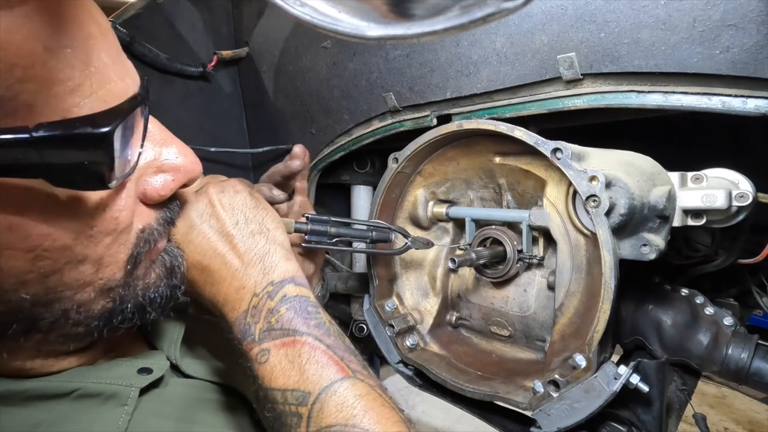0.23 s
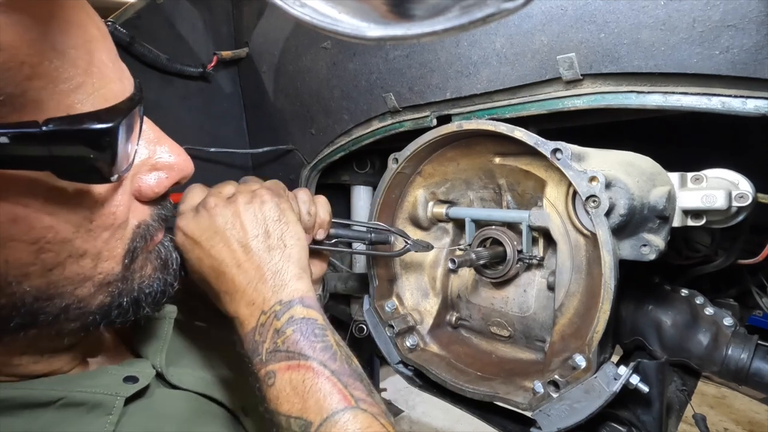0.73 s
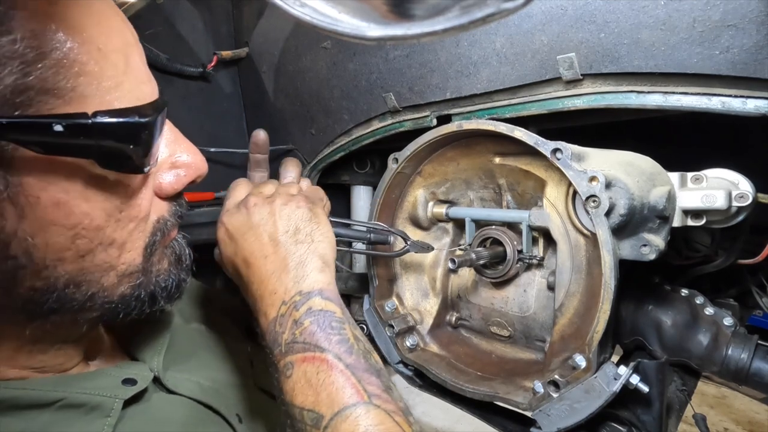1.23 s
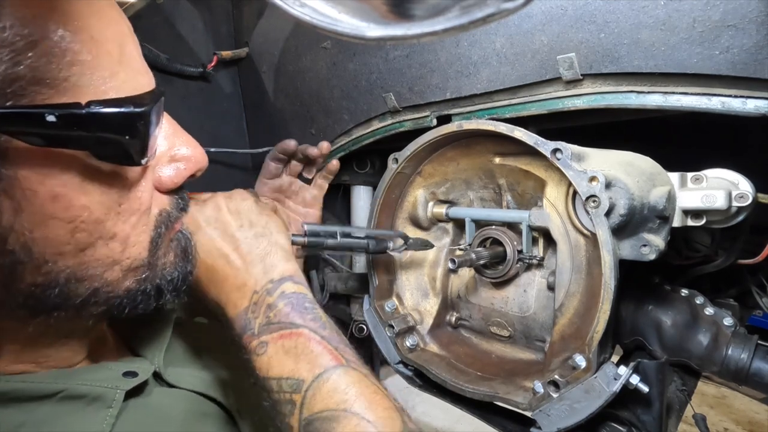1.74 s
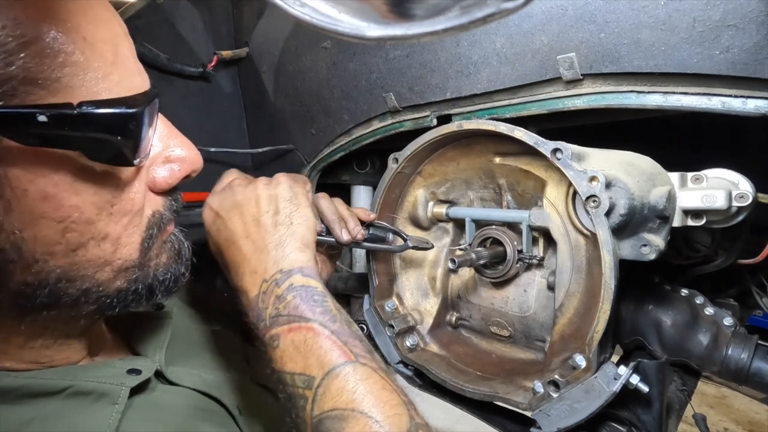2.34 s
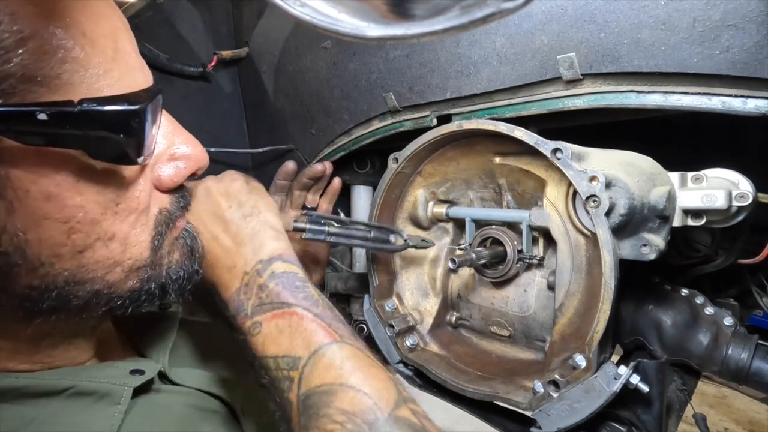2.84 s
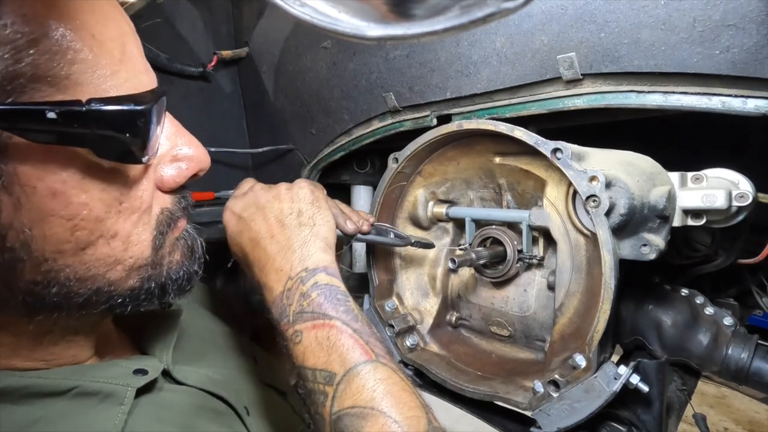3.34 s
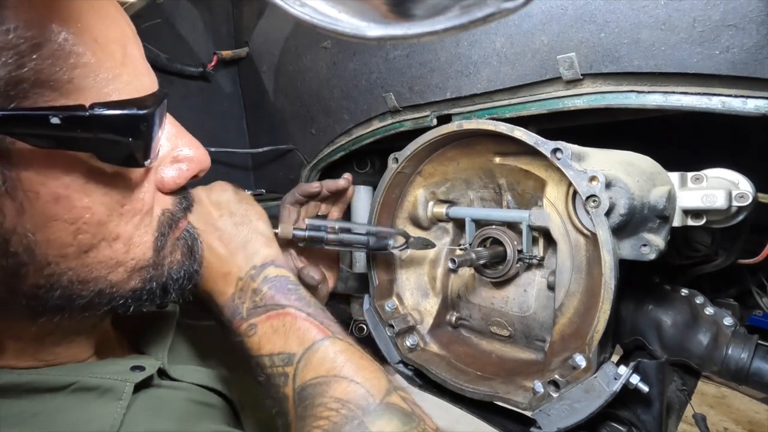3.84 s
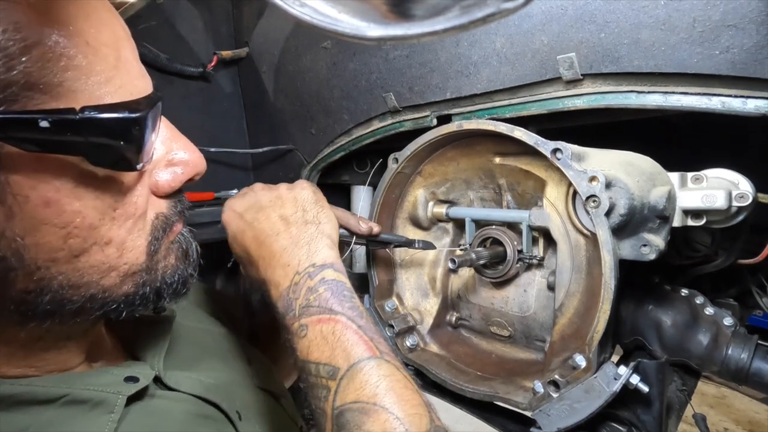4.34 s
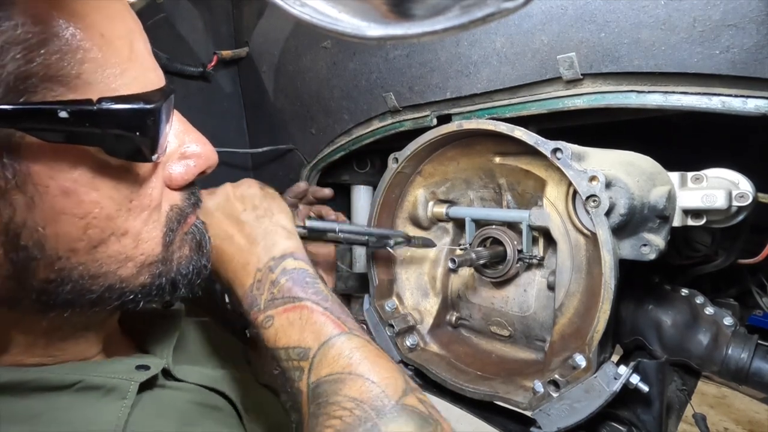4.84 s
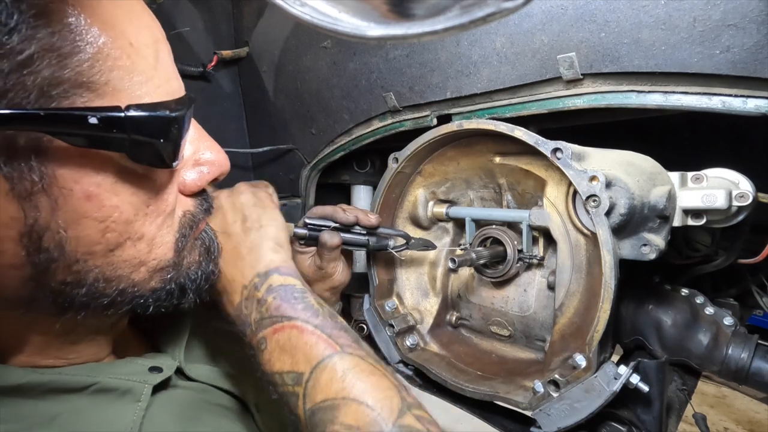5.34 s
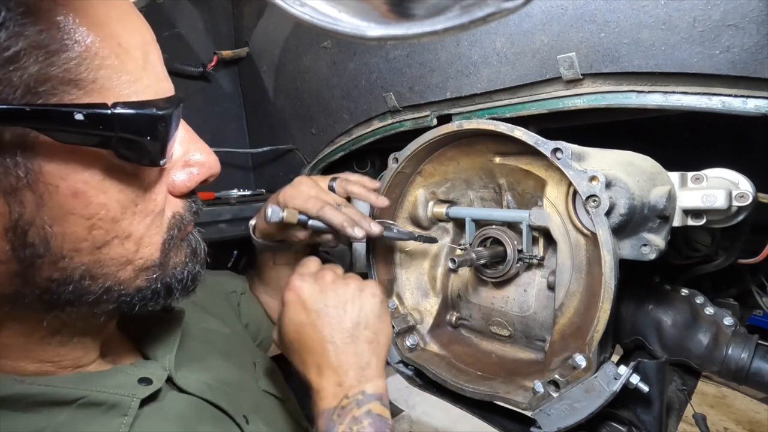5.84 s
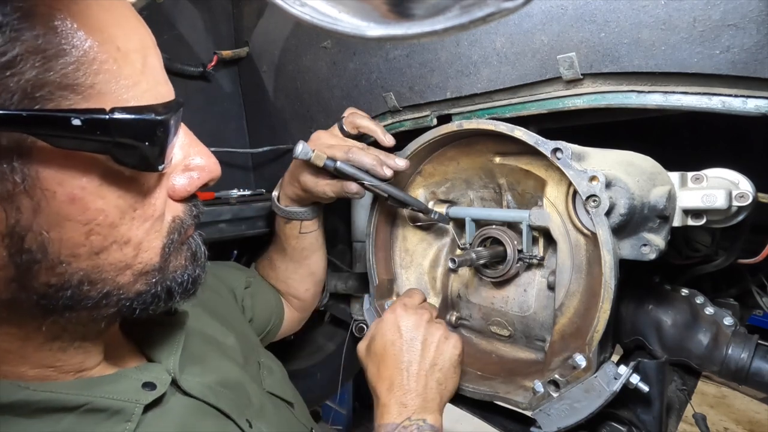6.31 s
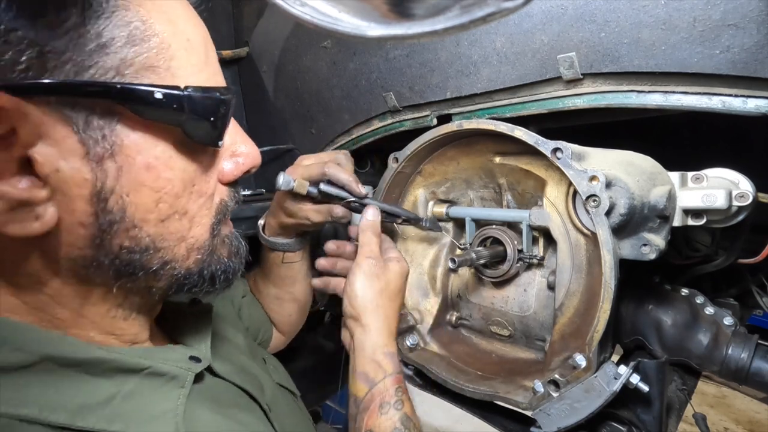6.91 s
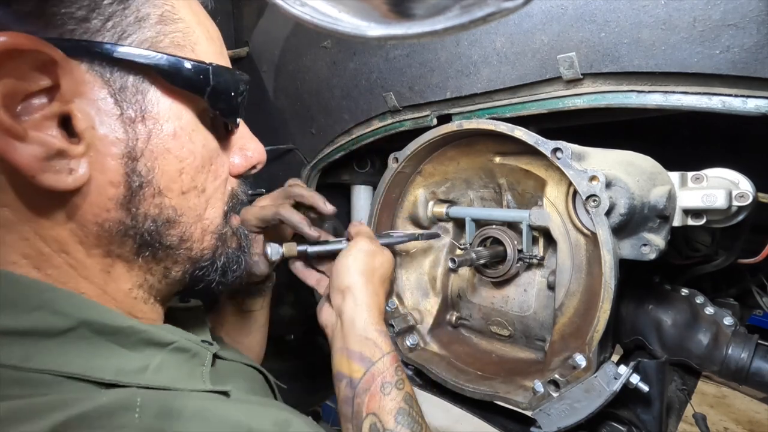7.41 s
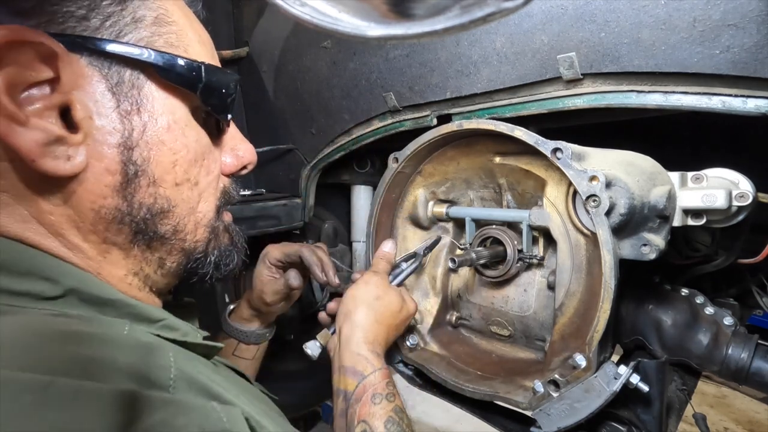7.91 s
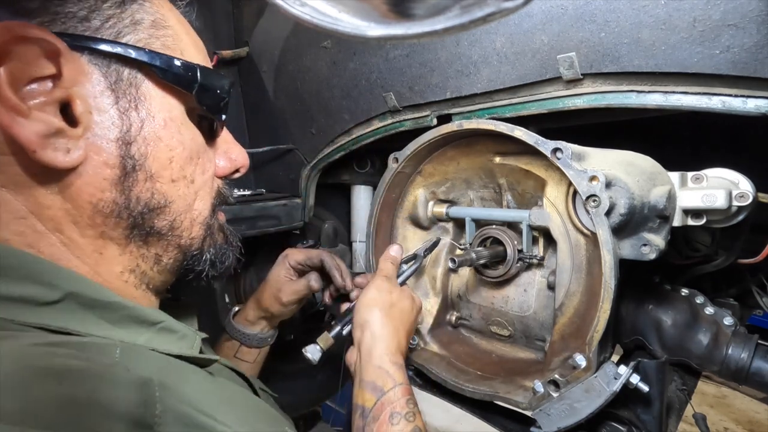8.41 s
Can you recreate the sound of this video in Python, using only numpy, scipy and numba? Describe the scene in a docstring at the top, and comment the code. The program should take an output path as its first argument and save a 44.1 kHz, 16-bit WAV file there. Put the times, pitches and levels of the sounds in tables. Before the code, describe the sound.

Close up in a workshop, spring-return pliers tick, scrape and whirr as their spiral rod is drawn out and spins. Four loud, crisp steel snaps come between two and five and a half seconds, each with a tiny bounce and a short dense echo. A steady low motor hum and soft, dark fan rush continue throughout; the last seconds hold mostly hum and faint deep thuds.

```python
"""Wire-twisting pliers are pulled, spin and snap back an arm's length from a small stereo camera in a workshop.
Steel parts tick and ring as decaying modes; the spiral rod rattles in its guide as tiny knocks excite its modes.
The workshop answers with a dense echo; behind it are fan noise, motor tones and a few deep soft thuds.
The camera turns everything above the bass down for a moment when it gets loud, as after each snap."""
import sys
import numpy as np
from scipy import signal
from scipy.fft import rfft, irfft, next_fast_len
from scipy.io import wavfile
from scipy.ndimage import uniform_filter1d
from numba import njit

SR = 44100
rng = np.random.default_rng(int(sys.argv[2]) if len(sys.argv) > 2 else 0)


def to_wav(s):
    """Save 16-bit WAV."""
    ch = np.atleast_2d(s).T  # columns
    pcm = np.round(np.clip(ch, -1, 1) * 32767)  # PCM
    wavfile.write(sys.argv[1], SR, pcm.astype(np.int16))


N = 381906

# modes of the hand-held pliers in three groups: (frequency [Hz], relative level [dB], t60 [s])
LOW_RING = [(2100, -8, .018), (2500, -6, .013), (2980, -1, .016), (3440, 0, .016), (3880, 0, .016),
            (4500, -1, .015), (4890, -5, .015)]
MIDDLE_RING = [(5510, -7, .014), (6050, -5, .014), (6610, -3, .015), (6960, -1, .015), (7530, 0, .018),
               (8120, -4, .014), (8860, -4, .014)]
HIGH_RING = [(9500, -3, .012), (9930, -1, .014), (10500, -2, .014), (11100, 0, .012), (12200, -7, .012),
             (12900, -9, .012), (13600, -14, .012)]
# modes of the spiral rod, free to ring, one list for each group: (frequency [Hz], relative level [dB], t60 [s])
ROD_RINGS = [
    [(3010, 0, .02), (3500, -3, .015), (4030, -3, .02), (4750, -3, .022)],
    [(6340, -4, .025), (6620, 0, .035), (7100, -6, .02), (7490, -4, .025), (7730, -5, .025),
     (8120, 0, .035)],
    [(10000, -9, .025), (10500, -8, .025), (11150, 0, .04), (11600, -11, .02), (12000, -11, .02),
     (12900, -7, .035), (13300, -14, .02), (15600, -27, .03)],
]
# borders of the low, middle and high group, then the upper limit of the spinning rod: frequency [Hz]
RING_EDGES_HZ = (2300, 5300, 9300, 13500, 15700)

# sprung rod snaps home and bounces once: (time [s], middle ring level [dB],
# low, middle and high pitch that stand out [Hz], bounce delay [s], bounce middle ring level [dB])
SNAPS = [(2.2516, -5, 4210, 6730, 10450, 0.0063, -24), (3.2981, -2, 4360, 7020, 9280, 0.0045, -18.5),
         (4.2456, -3.5, 3620, 7340, 9900, .0076, -20), (5.4158, -5, 3030, 8670, 9750, 0.0078, -24)]
# pitches that stand out in every bounce: frequency [Hz]
BOUNCE_HZ = (3950, 7440)
# a part knocks against the hand-held pliers:
# (time [s], middle ring level [dB], low over middle ring [dB], pitch that stands out [Hz])
KNOCKS = [(.5806, -43, 8, 3680), (.6215, -51, 5, 3380), (0.636, -44.5, 6.5, 3600), (0.644, -35, 4.5, 2650),
          (0.648, -33, -6.5, 8010), (.66, -30.5, 6.5, 2800), (.6888, -41, 2.5, 2880),
          (.8038, -33.5, 1.5, 7800), (.85, -44, -7, 7860), (.8874, -43, 0, 8010), (.9976, -49, 9, 2280),
          (1.058, -44.5, 5, 7200), (1.1532, -41, 13.5, 3100), (1.3877, -46, -7, 7900),
          (1.45, -48.5, 11, 2520), (1.6377, -53, 8, 2330), (1.694, -49, -4, 7600), (1.792, -39, -3, 8100),
          (1.856, -43.5, 10.5, 3640), (2.145, -42, 2.5, 5730), (2.208, -40, 8, 4850),
          (2.237, -32.5, -5, 4840), (2.2456, -23, -10.5, 7860), (2.3835, -43, -1, 7350),
          (2.4453, -42, -10, 6640), (2.556, -46, 9, 3530), (2.8973, -39, -4, 7580), (2.97, -28, -0.5, 7160),
          (3.25, -36, 1, 6590), (3.276, -33, -13, 7140), (3.282, -40, 6, 3100), (3.293, -26, 5, 3360),
          (3.313, -29.5, 1.5, 7320), (3.5425, -52.5, 13, 2930), (3.99, -33.5, 1.5, 3140),
          (4.104, -41.5, 10, 2900), (4.1415, -45, 3, 3270), (4.157, -49, 15, 3530),
          (4.1894, -44.5, 6, 3250), (4.2038, -29.5, -1, 7670), (4.218, -39, 1, 2930), (4.432, -42, 6, 2990),
          (4.4862, -48, -2, 3190), (4.549, -44.5, 9, 2970), (4.5954, -47.5, 12, 3540),
          (4.615, -34, 1, 6910), (5.0489, -37, -10, 7840), (5.0676, -35, 0, 3160),
          (5.107, -34.5, 4.5, 3950), (5.273, -36, 11.5, 3540), (5.29, -45, -5.5, 5680),
          (5.3787, -32.5, -10, 6720), (5.6727, -44, 2, 3600), (5.7833, -51, 19, 3060),
          (5.82, -43, -9, 6960), (5.855, -54, 17, 4300), (6.784, -51, 0, 7020), (7.107, -49, -1, 6310),
          (7.38, -58, 9.5, 2710)]
# the free rod is tapped in its guide: (time [s], high ring level [dB], middle over high ring [dB])
TAPS = [(.0677, -51, 14), (.164, -50, 10), (1.89, -47, -2), (1.8976, -36, -12), (2.999, -30, -18),
        (3.039, -42, -3), (3.1617, -52, 0), (3.5912, -46, -3), (3.8003, -50, -7), (3.883, -36, -7),
        (3.9759, -29.5, -9), (4.008, -33, -18), (4.8145, -52, -10), (4.8316, -40.5, 0.5), (4.9053, -48, 4),
        (4.9473, -41, -12), (5.002, -26, -4), (5.094, -38, -8), (5.125, -40, 0), (5.2495, -50, -6),
        (8.356, -54, -17)]
# the rod is drawn out and the pliers spin, gathering speed or coasting:
# (time [s], length [s], first level [dB], last level [dB]), before the balance of the rings
SPINS = [(.066, .03, -46, -62), (.17, 0.14, -44, -65), (1.89, .05, -48, -60), (2.14, .04, -47, -64),
         (2.985, 0.082, -50, -53), (3.162, .015, -58, -64), (3.245, .025, -43, -51),
         (3.59, 0.054, -54, -64), (3.805, 0.16, -52, -39), (3.982, 0.042, -36, -40), (4.822, .03, -50, -62),
         (4.89, 0.068, -55, -46), (5.005, 0.022, -37, -45), (5.05, 0.1, -44, -38.5)]
# the rod slides in its guide and hands shift their grip: columns as in SPINS
SLIDES = [(.58, .025, -44, -55), (.63, 0.028, -45, -26.5), (1.14, 0.015, -47, -39),
          (1.848, 0.014, -50, -37), (2.2, .048, -49, -31), (3.272, 0.037, -37, -32), (4.19, 0.06, -40, -34),
          (5.24, .03, -54, -50), (5.283, .02, -44, -49), (5.376, .036, -36, -28.5),
          (5.77, 0.033, -49, -42.5), (5.815, 0.067, -46, -58)]

# the camera's two ports hear the pliers unlike: (frequency [Hz], left minus right [dB])
PLIERS_LEFT = [(2000, -5.5), (4400, -1.3), (8000, -2.5), (15000, 2.5)]
# (frequency [Hz], phase by which left lags [rad])
PLIERS_LAG = [(1500, .6), (2600, .1), (4700, .3), (5100, .8), (5800, .1), (8300, .8), (9000, .2),
              (11300, .2), (11800, -1.6), (12500, -1.0), (13300, -.3)]
# workshop echo, its narrow bands ringing on in the cast housing:
# (low edge [Hz], high edge [Hz], level [dB], t60 [s])
SHOP_ECHO = [(1500, 8500, -14, 0.42), (5410, 5900, -21.5, .5), (9000, 14000, -25.5, .3),
             (6600, 6700, -17.5, .5), (9500, 10500, -25, .3)]

# spectrum of the rushing air: (frequency [Hz], relative density [dB per Hz])
AIR_SPECTRUM = [(20, -6), (36, -2), (66, -3.5), (97, -3.5), (142, -6), (185, -9), (270, -14.5), (480, -18),
                (800, -22.5), (1400, -25), (2300, -33.5), (4000, -39.5), (7400, -50), (8600, -59.5),
                (12500, -63.5), (14500, -93.5)]
# resonances of the duct: (frequency [Hz], width [Hz], boost [dB])
DUCT = [(1035, 135, 5.5), (1334, 90, 4), (1844, 210, 5)]
# likeness of the air in the two channels: (frequency [Hz], correlation [0-1])
AIR_ALIKE = [(25, .93), (60, .96), (130, .97), (290, .98), (640, .9), (1410, .82), (2400, .6), (3500, .72),
             (7000, .5), (10000, .75), (15000, .4)]
# balance of the air: (frequency [Hz], left minus right [dB])
AIR_LEFT = [(25, -1), (100, 0), (300, .4), (700, 2), (1290, 4), (2380, 1.5), (8120, 2), (15000, 3)]
# phase of the air: (frequency [Hz], phase by which left lags [rad])
AIR_LAG = [(300, 0), (900, .3), (1400, .7), (2000, 1.05), (2700, .45), (4500, .1), (6000, 0)]
# mains hum, a compressor, a fan and their sum tones: frequency [Hz] in one list, rms level [dB] in the other
HUM_HZ = [48.38, 55.14, 103.15, 110.31, 119.98, 128.41, 133.98, 148.3, 153.95, 161.98, 220.84, 239.98,
          253.95, 307.88, 331.15, 359.96, 479.97, 699.11]
HUM_DB = [-40, -26, -35, -38, -16, -26, -32, -43, -33, -43, -48, -48, -40, -45, -51, -47, -52, -51]
# deep soft thuds: (time [s], peak level [dB], frequency [Hz], length [s])
THUDS = [(3.27, -8, 30.3, 0.059), (6.189, -17, 30, 0.19), (6.67, -18, 32, 0.13), (7.203, -13, 34, 0.18),
         (8.018, -19, 34, 0.1)]


def undb(db):
    """Decibels to gain."""
    return 10 ** (np.asarray(db) / 20)


def unit(x):
    """Scale to rms 1."""
    return x / np.sqrt(np.mean(x ** 2))


def on_log(table, hz):
    """Read (Hz, value) rows on a log-frequency axis."""
    return np.interp(np.log(hz), np.log(np.array(table)[:, 0]), np.array(table)[:, 1])


def band(x, lo_hz, hi_hz, order=2):
    """Band-pass."""
    return signal.sosfilt(signal.butter(order, [lo_hz, hi_hz], "band", fs=SR, output="sos"), x)


def add(out, s, sound):
    """Mix a stereo sound in from time s."""
    i = int(s * SR)
    out[:, i:i + sound.shape[1]] += sound[:, :N - i]


def walk(rate):
    """Random levels held 1 / rate s and slewed twice; spread 1."""
    k = int(SR / rate)
    return unit(uniform_filter1d(uniform_filter1d(np.repeat(rng.standard_normal(N // k + 1), k), k), k)[:N])


@njit
def follow(x, attack, release):
    """Envelope that rises fast and falls slowly."""
    e, out = 0., np.empty(len(x))
    for i in range(len(x)):
        e += (x[i] - e) * (attack if x[i] > e else release)
        out[i] = e
    return out


def pliers_blows(scatter_db=5.0, detune=0.02, crack_db=-2.3, crack_s=0.0059, rise_s=0.00042, stray_db=3.5):
    """Blows ring the hand-damped pliers under a crack of chattering contacts; taps ring the free rod's modes."""
    struck_db, struck_t60 = 8.0, .016  # the pitches that stand out
    dull_hz = 12800.0
    out = np.zeros((2, N))
    t = np.arange(int(SR / 12)) / SR
    for s, ring_db, pan_db, pitches, on_rod in snaps_knocks_and_taps():
        sound = 0
        for k, body in enumerate((LOW_RING, MIDDLE_RING, HIGH_RING)):
            lo_hz, hi_hz = RING_EDGES_HZ[k:k + 2]
            if on_rod:
                blow = struck_modes(ROD_RINGS[k], t, scatter_db, detune / 4)
            else:
                crack = unit(band(rng.standard_normal(len(t)), lo_hz, hi_hz, order=3)) * np.exp(-t / crack_s)
                # grip and place of the blow decide which pitch stands out
                struck = [(hz, struck_db, struck_t60) for hz in pitches if lo_hz <= hz < hi_hz]
                blow = struck_modes(body + struck, t, scatter_db, detune) + undb(crack_db) * crack
            sound = sound + undb(ring_db[k]) * blow
        pan_db = pan_db + stray_db * rng.standard_normal()
        left_right = undb(np.array([[pan_db], [-pan_db]]) / 2)
        add(out, s, sound * (1 - np.exp(-t / rise_s)) * left_right)
    # the blows carry little of the very top
    return signal.sosfilt(signal.butter(3, dull_hz, fs=SR, output="sos"), out)


def snaps_knocks_and_taps():
    """Every blow: (s, low, middle and high ring dB, left minus right dB, pitches that stand out, on free rod)."""
    rows = []
    for s, db, *pitches, after_s, bounce_db in SNAPS:
        rows.append((s, (db - 3.5, db, db - 6), 6.5, pitches, False))
        bounce_rings = (bounce_db + 1, bounce_db, bounce_db - 13)
        rows.append((s + after_s, bounce_rings, -6.5, BOUNCE_HZ, False))
    for s, db, low_db, hz in KNOCKS:
        rows.append((s, (db + low_db, db, db - 6.5), 3, [hz], False))
    for s, db, middle_db in TAPS:
        rows.append((s, (db - 8.5, db + middle_db, db), 5.5, [], True))
    return rows


def struck_modes(modes, t, scatter_db, detune):
    """One blow sets decaying sines going, rms 1 over its first 150 samples; strengths and pitches vary."""
    hz, db, t60 = np.transpose(modes)[:, :, None]
    strength, shift = rng.standard_normal((2, len(modes), 1))
    level = undb(db + scatter_db * strength - 60 * t / t60)
    sound = np.sum(level * np.sin(2 * np.pi * hz * (1 + detune * shift) * t), axis=0)
    return sound / np.sqrt(np.mean(sound[:150] ** 2))


def rattle(strokes, ring_db, groups, top_hz, grip, rate, spread_db, wander_db, grit_db, left_db):
    """Tiny uneven knocks keep modes ringing; moving contact favours ever other modes, a firm grip widens them."""
    out = np.zeros((2, N))
    gain = stroke_gain(strokes)
    chance = rng.random((3, N))
    knock_sizes = undb(-spread_db * np.log(chance[1] + 1e-9))
    knocks = (chance[0] < rate / SR) * knock_sizes * np.sign(chance[2] - .5)  # rate is knocks per second
    for k, modes in enumerate(groups):
        ringing = 0
        for hz, db, t60 in modes:
            mode = unit(band(knocks, hz - grip / t60, hz + grip / t60, order=2))
            ringing = ringing + undb(db + wander_db * walk(45.)) * mode
        # the bare knocks are heard as grit between the modes
        grit = unit(band(knocks, *RING_EDGES_HZ[k:k + 2], order=3))
        sound = unit(ringing) + undb(grit_db) * grit
        sound = band(sound, RING_EDGES_HZ[k], top_hz if k == 2 else RING_EDGES_HZ[k + 1])
        left_right_db = np.array([[left_db[k]], [-left_db[k]]]) / 2
        out += unit(sound) * gain * undb(ring_db[k] + left_right_db)
    return out


def stroke_gain(strokes, attack_s=.02, release_s=.032, uneven_db=2, jerks_per_s=51):
    """Each stroke rises 30 dB, runs from its first level to its last, falls 30 dB; the hand pushes in jerks."""
    t = np.arange(N) / SR
    gain = 0
    for s, length, first_db, last_db in strokes:
        times = [s - attack_s, s, s + length, s + length + release_s]
        levels = [first_db - 30, first_db, last_db, last_db - 30]
        gain = gain + undb(np.interp(t, times, levels, left=-200, right=-200))
    return uniform_filter1d(gain, size=200) * undb(uneven_db * walk(jerks_per_s))


def camera_ports(pliers):
    """The camera body shifts level and phase of the close sound between its two ports."""
    size = next_fast_len(N)
    hz = np.maximum(np.arange(size // 2 + 1) * SR / size, 1)
    half = undb(on_log(PLIERS_LEFT, hz) / 2) * np.exp(-.5j * on_log(PLIERS_LAG, hz))
    return irfft(rfft(pliers, size) * np.array([half, 1 / half]), size)[:, :N]


def workshop_echo(x, build_s=0.01):
    """Dense noise echoes build up and die away band by band, unrelated left and right."""
    t = np.arange(int(.8 * SR)) / SR
    echo = 0
    for lo_hz, hi_hz, db, t60 in SHOP_ECHO:
        noise = band(rng.standard_normal((2, len(t))), lo_hz, hi_hz)
        tail = noise * undb(-60 * t / t60) * (1 - np.exp(-t / build_s))
        # longer tails are scaled down to carry like energy
        echo = echo + undb(db) * tail * np.sqrt(np.log(1000) * 2 / (t60 * SR))
    return signal.fftconvolve(x[None], echo, axes=1)[:, :N]


def fan_air(level_db=-21.5, flicker_db=1.0):
    """Fan noise coloured by a duct; each octave flickers a little; alike in the bass, wide on top."""
    size = next_fast_len(N)
    hz = np.maximum(np.arange(size // 2 + 1) * SR / size, 1)
    db = on_log(AIR_SPECTRUM, hz)
    for centre_hz, width_hz, boost_db in DUCT:
        db = db + boost_db / (1 + (2 * (hz - centre_hz) / width_hz) ** 2)
    alike = np.clip(on_log(AIR_ALIKE, hz), 0, 1)
    mid, side = rfft(rng.standard_normal((2, size)))
    sign = np.array([[1], [-1]])  # left, right
    both = np.sqrt(1 + alike) * mid + sign * np.sqrt(1 - alike) * side
    both *= undb(db + sign * on_log(AIR_LEFT, hz) / 2)
    both *= np.exp(-sign * .5j * on_log(AIR_LAG, hz))
    out = 0
    octave = np.log2(hz / 20)
    for k in range(11):
        share = np.clip(1 - abs(octave - k), 0, 1)  # neighbouring octaves crossfade
        out = out + undb(flicker_db * walk(6.0)) * irfft(both * share, size)[:, :N]
    return unit(out) * undb(level_db)


def motor_hum(waver_db=.3):
    """Sines at the motors' steady pitches, each wavering slightly in level, sum alike in both channels."""
    t = np.arange(N) / SR
    start = rng.random(len(HUM_HZ))
    out = 0
    for hz, db, phase in zip(HUM_HZ, HUM_DB, start):
        level = np.sqrt(2) * undb(db + waver_db * walk(1.8))
        out = out + level * np.sin(2 * np.pi * (hz * t + phase))
    return out


def thuds():
    """Each thud is a short run of deep sound under a smooth swell."""
    out = np.zeros((2, N))
    for s, db, hz, length in THUDS:
        t = np.arange(int(length * SR)) / SR
        thud = undb(db) * np.sin(np.pi * t / length) * np.sin(2 * np.pi * hz * t)
        add(out, s, np.tile(thud, (2, 1)))
    return out


def scene():
    """Pliers close to the camera with the workshop's echo, over air, hum and thuds."""
    # ring_db and left_db list the low, middle and high ring
    spin = rattle(SPINS, [-3.5, -2.5, -0.5], ROD_RINGS, RING_EDGES_HZ[4], grip=2.3, rate=1700.,
                  spread_db=3.2, wander_db=4.0, grit_db=-9.5, left_db=[1.5, 2.5, 5.0])
    slide = rattle(SLIDES, [-2, -5.5, -12.5], (LOW_RING, MIDDLE_RING, HIGH_RING), RING_EDGES_HZ[3], grip=4.4,
                   rate=2500., spread_db=2.5, wander_db=4.5, grit_db=-2.0, left_db=[.8, 1.2, 1.5])
    pliers = camera_ports(pliers_blows() + spin + slide)
    return pliers + workshop_echo(pliers.mean(axis=0)) + fan_air() + motor_hum() + thuds()


def record(dry, split_hz=200.0, knee_db=-14.0, slope=0.55, attack_s=0.0021, release_s=0.1, top_hz=15700):
    """The camera's gain control acts above the bass only; peaks clip; the top is cut."""
    bass = signal.sosfiltfilt(signal.butter(2, split_hz, fs=SR, output="sos"), dry)
    upper = dry - bass
    # the louder channel steers both
    loud = follow(abs(upper).max(axis=0), 1 / (attack_s * SR), 1 / (release_s * SR))
    gain = np.minimum(1, (undb(knee_db) / (loud + 1e-9)) ** slope)
    clipped = np.clip(bass + upper * gain, -1, 1)
    top_cut = signal.ellip(8, .2, 60, top_hz, fs=SR, output="sos")
    return np.clip(signal.sosfilt(top_cut, clipped), -1, 1)


dry = scene()
out = record(dry)
to_wav(out)
```